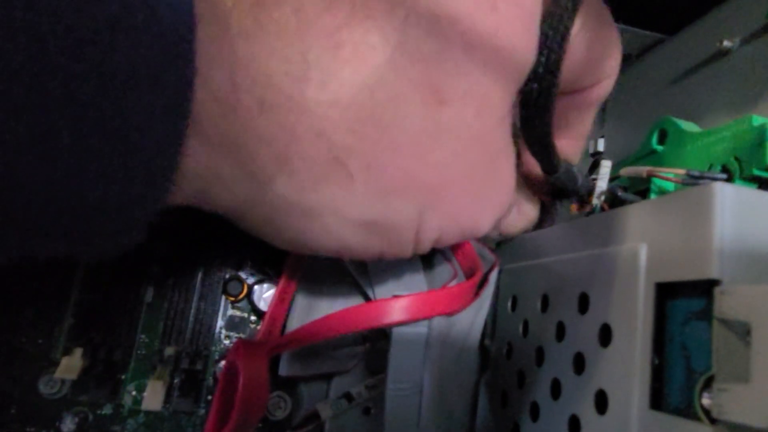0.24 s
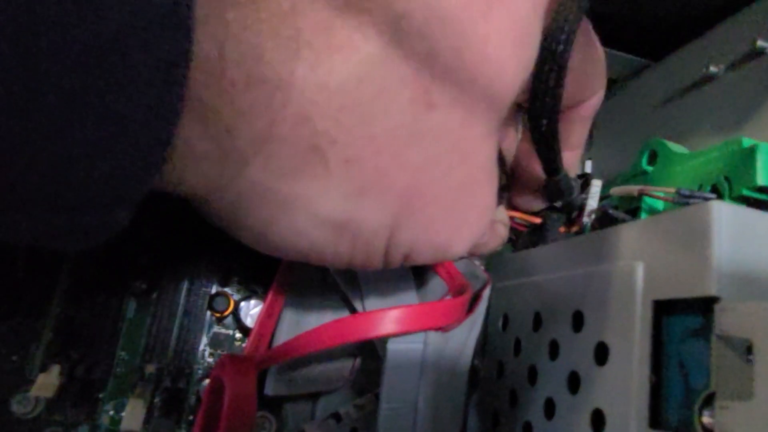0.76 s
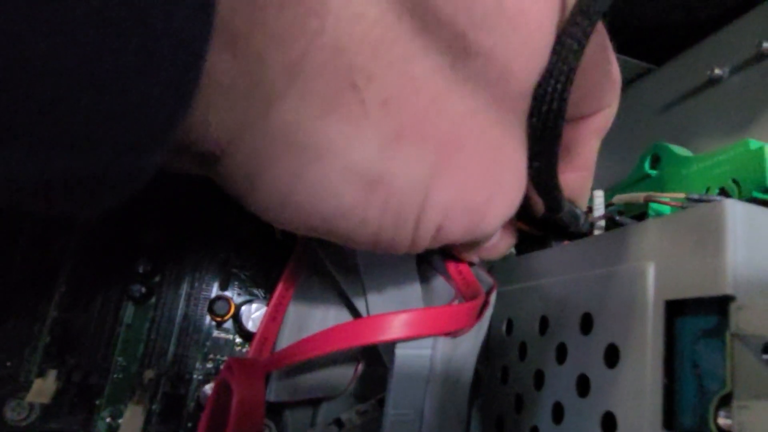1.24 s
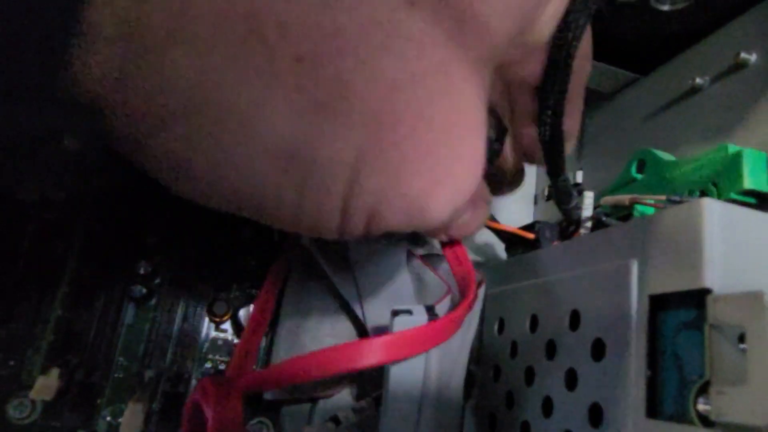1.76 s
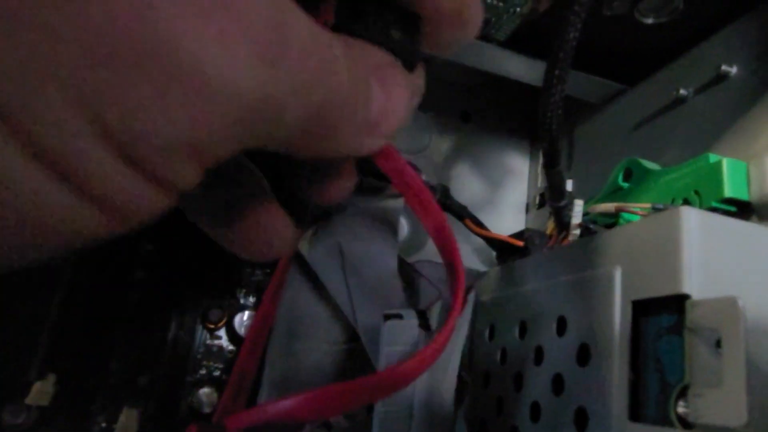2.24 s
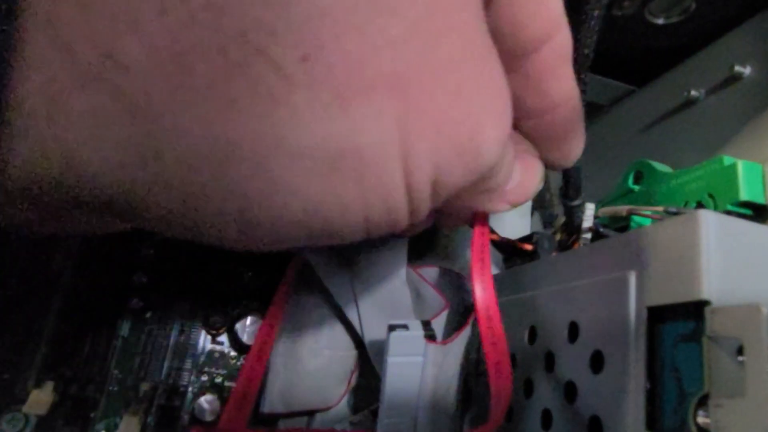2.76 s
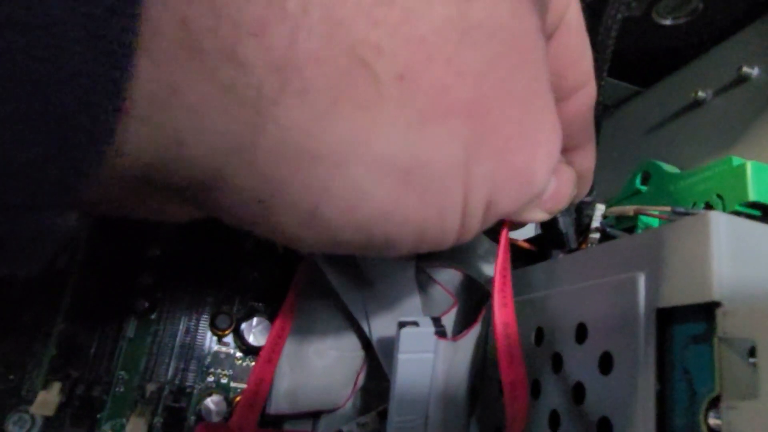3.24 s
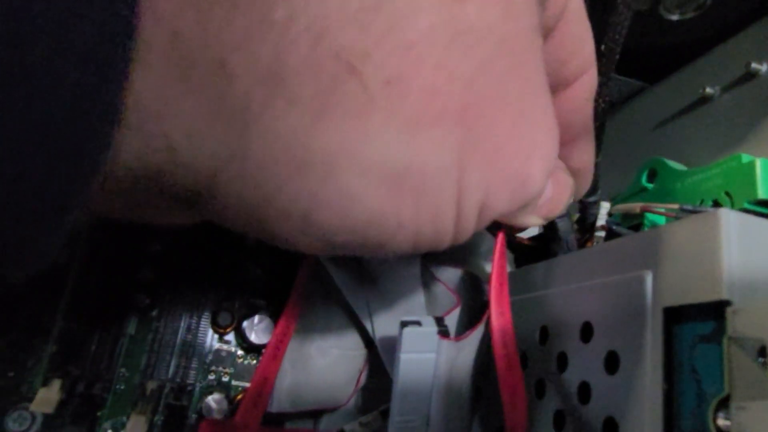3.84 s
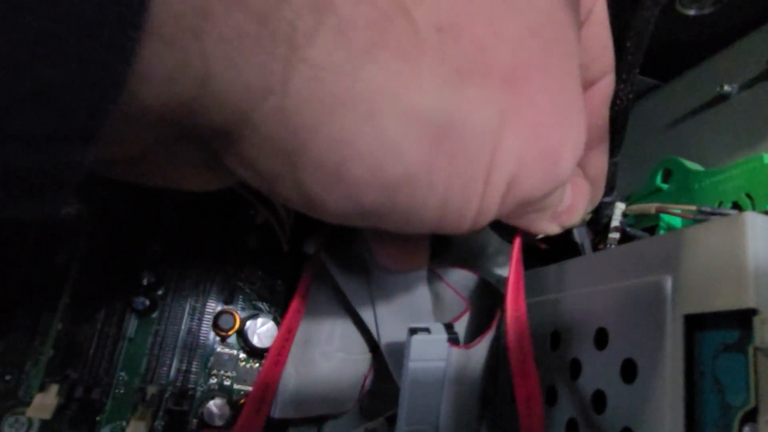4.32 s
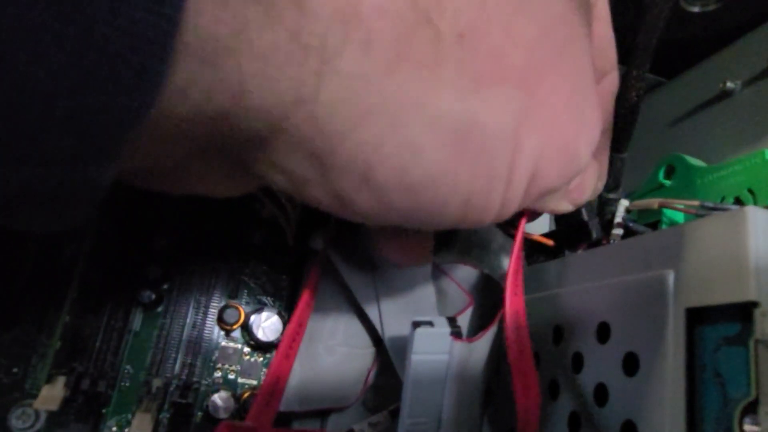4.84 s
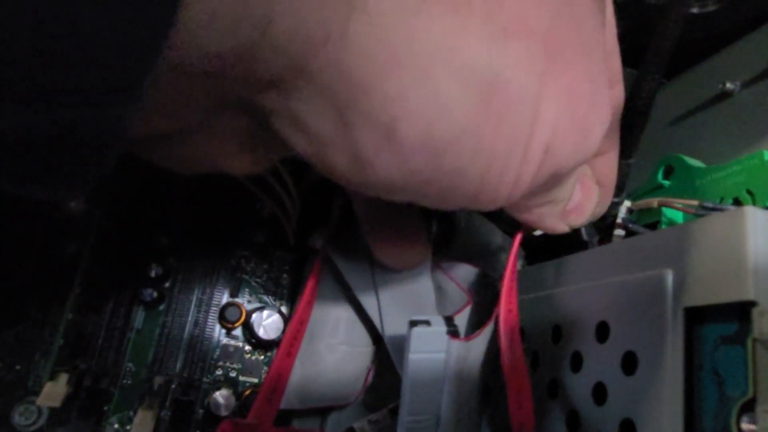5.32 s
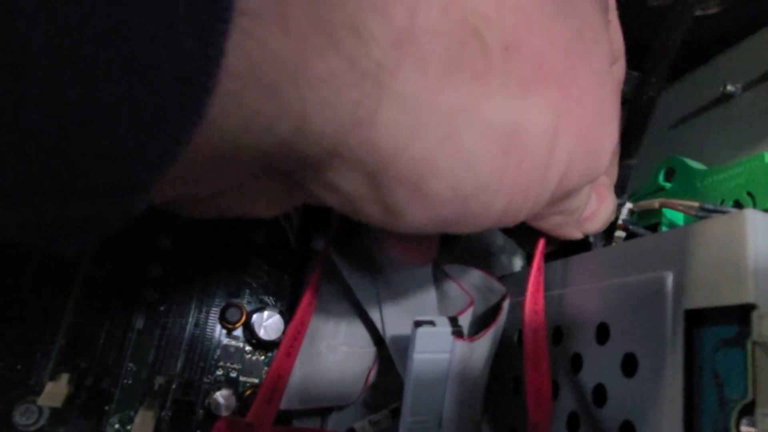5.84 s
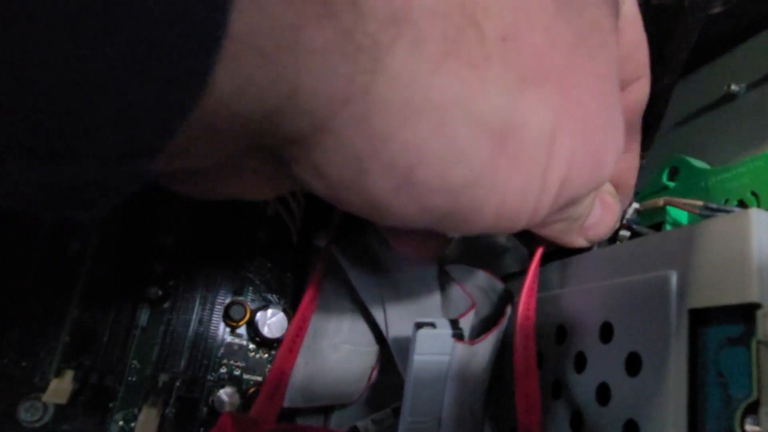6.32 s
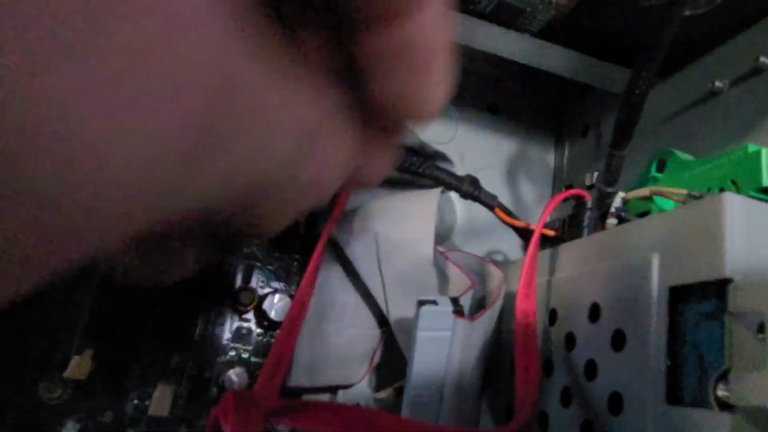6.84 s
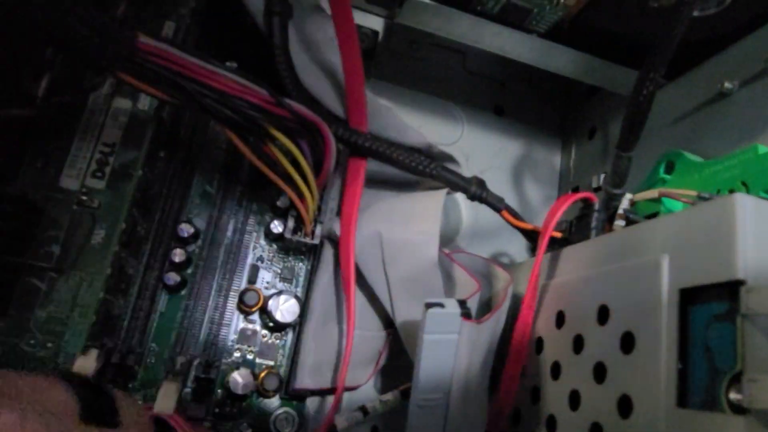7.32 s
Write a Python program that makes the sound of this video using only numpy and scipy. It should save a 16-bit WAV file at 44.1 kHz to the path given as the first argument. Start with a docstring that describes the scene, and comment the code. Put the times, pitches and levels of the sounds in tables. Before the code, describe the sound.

Very close, dry sound inside an open steel computer case in a quiet room, with faint steady hiss. Light rubbing starts, then a hard double clack with a short metallic ring and rattle at 0.3 s. After a quiet gap, another hollow knock with a dull thump lands at 1.1 s. From 1.5 to 2.25 s comes the busiest passage: dense plastic ticks, grainy cable scraping, connector knocks and a heavy low thump at about 2.0 s. It drops away to near silence. A modest knock sounds at 2.9 s, with small clicks around 3.0 to 3.3 s, the last one sharper. Almost nothing follows until 4.6 to 5.15 s, when soft clicks and rubbing return. Faint touches continue until a crisp, bright double knock at 6.25 s. A looser flurry of snaps, rustles and thumps runs from 6.7 to 7.1 s, then small taps near 7.2 s fade into hiss.

```python
"""Inside an open steel computer case, hands plug cables right next to a small camera.
Connectors knock: ringing case modes, a noise rattle and a crack. Cables tick: short damped sines.
Cables and skin drag: grainy noise that also excites the case modes. The case thumps: low damped sines.
The hollow case adds a short diffuse tail to ticks and knocks; faint shaped-noise hiss lies under it all."""
import sys
import numpy as np
from scipy import signal
from scipy.fft import rfft, irfft, next_fast_len
from scipy.io import wavfile
from scipy.ndimage import uniform_filter1d, map_coordinates

SR = 44100
rng = np.random.default_rng(int(sys.argv[2]) if len(sys.argv) > 2 else 0)


def store_pcm(level_fs):
    """Save levels as 16-bit WAV."""
    pcm = np.round(np.clip(level_fs, -1, 1) * 32767).astype(np.int16)
    wavfile.write(sys.argv[1], SR, np.atleast_2d(pcm).T)


N = 334278

# Connectors knocking the case, before tail and microphone: start_s, peak_db, dull_hz, sharp_hz,
# sharp_db, ring_length_factor, rattle_db (re ring)
KNOCK_EVENTS = [(0.303, -35.5, 1110, 1800, 10, 1.1, 5), (0.3296, -11.5, 690, 2510, -5, 1, -1),
                (.333, -17, 285, 3886, -11.5, 1.14, -7.5), (0.442, -31.5, 530, 1560, 2.5, 0.47, 11),
                (.819, -51.5, 659, 1600, -1.5, 3.8, 11.5), (1.122, -11.5, 550, 2600, -4.5, 1.38, -0.5),
                (1.9041, -15, 968, 1996, 5.5, 1.02, -4), (1.997, -20.5, 1080, 1980, -2, 0.36, -11),
                (2.075, -18.5, 1053, 1924, 3.5, 0.45, -4), (2.681, -50, 760, 1880, -30, 1.3, -10.5),
                (2.749, -48, 880, 1530, -32, 2.2, -5), (2.835, -54, 700, 1600, -18, 1.42, -8),
                (2.862, -25.5, 850, 4206, -9, 0.69, -3.5), (4.588, -50.5, 900, 2650, 11.5, 2.04, 9),
                (5.2986, -36.5, 774, 2190, 8.5, 0.97, -1), (6.2429, -19, 745, 3000, 15.5, 0.58, 0.5),
                (6.29, -29.5, 872, 2074, -4, 0.37, -5.5), (6.394, -54, 644, 1620, -11, 0.84, -14),
                (6.551, -66.5, 982, 2084, 6, 0.796, 8.5), (7.176, -47.5, 620, 2480, 15.5, 2.7, -3.5),
                (7.2071, -22.5, 820, 3020, 0.5, 0.46, -2.5), (7.2554, -33, 695, 1810, -8, 0.53, -12),
                (7.437, -54.5, 910, 2550, -1.5, 3.9, 8)]
# Clearest slips of cables, before tail and microphone: start_s, peak_db, pitch_hz, life_cycles, push_db
TICK_EVENTS = [(0.3895, -34.5, 2830, 0.3, -55.5), (1.477, -39, 2596, 5.8, -39),
               (1.5863, -22, 2870, 0.39, -35), (1.6012, -21, 1740, 0.5, -46), (1.611, -34, 4000, .5, -42.5),
               (1.6278, -22, 2200, .45, -41), (1.6317, -12.5, 1330, 0.83, -21),
               (1.6427, -18, 1260, 3.1, -7.5), (1.6497, -18.5, 3980, 0.31, -43),
               (1.6555, -20.5, 1940, .38, -33), (1.66, -19, 1880, 0.3, -20), (1.7, -30.5, 2840, .5, -42),
               (1.7118, -29, 2300, .6, -34.5), (1.7161, -13, 1880, .66, -12), (1.722, -27, 1605, 1.3, -42),
               (1.7552, -22, 1980, 2.9, -18), (1.7701, -26, 1880, 2.7, -39), (1.785, -33, 2080, 1.3, -15),
               (1.8026, -19, 1780, 0.65, -30), (1.8377, -20, 2020, .77, -44), (1.9208, -15, 1870, 1.2, -37),
               (1.939, -32, 4800, 1.2, -74), (1.968, -26, 3940, 0.5, -32), (1.984, -24, 1970, 1.3, -22.5),
               (2.0053, -19.5, 2750, .83, -42), (2.0127, -17, 1920, 2.8, -12),
               (2.0535, -17.5, 1920, 0.78, -24), (2.0839, -24.5, 1840, 2.5, -13),
               (2.1046, -28.5, 1880, 2.7, -25), (2.1171, -26.5, 2680, 0.44, -37),
               (2.1778, -25.5, 1690, .57, -22.5), (2.2227, -29, 1950, 1.7, -21.5),
               (2.262, -45.5, 2320, 1.1, -57), (2.303, -47.5, 2160, .79, -71.5),
               (2.4849, -51, 2044, 3, -58.5), (2.5303, -52.5, 2235, 2.8, -54),
               (2.775, -43, 1730, 0.37, -39), (3.0017, -38.5, 2490, 3.5, -65),
               (3.0153, -43, 5530, .84, -60), (3.0286, -31.5, 1360, 0.4, -30), (3.075, -49, 2590, 2.3, -41),
               (3.1198, -41, 2790, 2.7, -54), (3.1303, -38, 2650, 1.9, -37),
               (3.1415, -35.5, 2520, 1.1, -35), (3.195, -42.5, 2360, 2.3, -29.5),
               (3.2927, -19.5, 2110, 0.48, -10), (3.321, -32, 1570, 0.76, -47),
               (3.456, -54.5, 1500, 1.22, -42), (3.9267, -49.5, 1100, 0.53, -42),
               (4.5178, -51.5, 2673, 0.68, -46), (4.5919, -42, 2420, 0.83, -49),
               (4.656, -29.5, 2910, 1.6, -28), (4.6777, -28.5, 3600, 0.3, -18.5),
               (4.724, -39, 7000, 0.95, -60), (4.7964, -43, 2200, 1.4, -22), (4.845, -41, 2390, 1.4, -23),
               (4.8535, -42, 6500, .8, -55), (4.8668, -31.5, 1980, 0.88, -19),
               (4.9353, -23, 2750, 0.39, -21), (4.9451, -32, 2630, 1, -28), (4.9595, -25, 2500, .44, -25),
               (5.0176, -26, 2420, .72, -21.5), (5.0532, -36.5, 4830, 0.25, -20.5),
               (5.0889, -23.5, 2000, 0.43, -20), (5.111, -45, 6000, 0.72, -62),
               (5.131, -28.5, 2620, 0.27, -19), (5.5054, -52.5, 2237, 0.89, -45.5),
               (6.4373, -57, 3940, 1.23, -53), (6.7076, -34, 1930, 2.2, -22.5),
               (6.7778, -35, 2150, 1.2, -47), (6.7991, -22.5, 2500, 0.67, -16),
               (6.8212, -17.5, 1640, 0.62, -8.5), (6.8526, -33, 1600, 2.8, -23),
               (6.9, -19.5, 1800, 0.49, -14.5), (6.9605, -18.5, 2200, 0.47, -27),
               (6.9687, -32, 2650, 1.3, -41), (7.0334, -34.5, 1500, 0.6, -33),
               (7.0873, -28.5, 3080, 0.43, -37), (7.2605, -43, 5000, .6, -52), (7.277, -45, 2870, 1.2, -66),
               (7.3073, -41, 2280, 0.89, -62)]
# Soft thumps through the case: start_s, peak_db, pitch_hz
THUMP_EVENTS = [(0.153, -33.5, 110), (0.247, -41, 87), (0.328, -24, 82), (.661, -42, 120),
                (0.937, -46.5, 82), (1.123, -19.5, 140), (1.474, -29.5, 74), (1.562, -22.5, 77.4),
                (1.624, -17.5, 157), (1.757, -20.5, 133), (2.0173, -7, 74.3), (2.177, -23, 125),
                (2.22, -32.5, 99), (2.756, -42.5, 56.5), (3.022, -41, 68), (3.296, -26, 105),
                (3.783, -57.5, 63.2), (3.913, -60, 145), (4.066, -50, 59), (4.304, -53.5, 67),
                (4.589, -34.5, 61), (4.677, -28.5, 117), (4.779, -43, 75), (5.356, -38, 65.4),
                (5.496, -67, 109.6), (5.646, -45.5, 75.6), (5.884, -43.5, 62), (6.172, -39.5, 76),
                (6.415, -45, 58.5), (6.799, -26, 107), (6.82, -18.5, 101), (6.897, -23, 127),
                (6.937, -31, 133), (6.963, -23, 105), (7.058, -35, 170), (7.243, -48, 93.5)]
# Strokes of cables and skin: full_pressure_s, held_s, rustle_db, rumble_db, brightness_db
DRAG_STROKES = [(0.0, .11, -73, -55.5, 6.5), (.25, .05, -52, -35.5, -3), (.345, .01, -36.5, -31.5, -10.5),
                (.41, 0.07, -50, -39, -16), (0.659, 0.012, -62.5, -45, -24.5),
                (.83, 0.027, -60.5, -61.5, -12), (.96, .03, -66, -52, -8.5), (1.16, 0.0266, -47, -40.5, -9),
                (1.271, 0.11, -65.5, -60.5, -11), (1.512, 0.18, -47.5, -37.5, 0.5),
                (1.62, 0.16, -33.5, -31, -1), (1.92, 0.029, -42.5, -40, 4.5), (2.03, 0.05, -39, -33, 0.5),
                (2.21, 0.013, -48.5, -49, 2), (2.4, 0.16, -76.5, -68.5, 4), (2.7, 0.085, -66, -61, -3),
                (2.885, 0.0092, -58, -51, 3), (3.035, 0.028, -49, -47, -6),
                (3.146, 0.022, -51, -43.5, -3.5), (3.28, 0.034, -51, -47.5, -4.5),
                (3.4, 0.1, -68, -68.5, -15), (3.55, .03, -72.5, -60, -1), (3.68, .1, -79, -74.5, -6),
                (4.08, 0.016, -76, -67.5, -0.5), (4.32, .02, -82.5, -70.5, -2),
                (4.52, 0.057, -75.5, -64, 6), (4.672, 0.029, -50.5, -38.5, 3),
                (4.773, 0.076, -47.5, -35.5, 1.5), (4.88, 0.056, -43, -33.5, -0.5),
                (4.99, .13, -54.5, -42, 1), (5.32, 0.045, -68, -58.5, 1), (5.641, 0.048, -70, -58, -5),
                (5.741, .05, -70, -67, -7), (5.9, 0.015, -74.5, -59.5, -1), (6.2, 0.027, -71, -56.5, -3),
                (6.25, 0.042, -67.5, -50, 9.5), (6.43, 0.0056, -65.5, -67.5, -18.5),
                (6.702, 0.022, -46, -42, -6.5), (6.818, 0.054, -39, -38.5, -2.5),
                (6.928, 0.04, -47, -36, 4), (7.06, 0.026, -61.5, -58, 3), (7.201, 0.099, -57, -54, 2.5),
                (7.453, 0.013, -61.5, -53.5, 0.5)]
# Modes of the steel case: mode_hz, level_db, t60_s
CASE_MODES = [(278.6, -4, 0.13), (390, -7, 0.088), (461.6, -7.5, 0.073), (561, 0, 0.13), (648.2, -3, 0.13),
              (715, -4.5, 0.097), (850, -4.5, 0.069), (916.6, -2.5, 0.09), (992.6, -2.5, 0.087),
              (1116, -4.5, 0.057), (1325, -3.5, 0.06), (1476, -11.5, 0.048), (1886, -6, 0.039),
              (2027, -8, 0.078), (2295, -4.5, 0.032), (2834, -10.5, 0.035), (2970, -2.5, 0.028),
              (3325, -5.5, 0.035), (3610, -8.5, 0.044), (3940, -2.5, 0.039), (4270, -6, 0.036),
              (4830, -8.5, 0.03), (5100, -5.5, .025), (5800, -12.5, 0.034)]
# Rattle decay, before the ring length factor: freq_hz, t60_s
RATTLE_DECAY = [(150, 0.32), (700, 0.13), (1800, 0.096), (5000, 0.051), (12000, .06)]
# Relative spectrum of the rumble through the case: freq_hz, level_db_per_hz
RUMBLE_SPECTRUM = [(15, -52), (25, -10.5), (70, 7), (97, -2), (167, -3), (344, -13), (401, -16),
                   (700, -21.5), (910, -49), (1540, -120)]
# Relative spectrum of the rustle: freq_hz, level_db_per_hz
RUSTLE_SPECTRUM = [(180, -32), (300, -3.5), (404, -10), (476, -7.5), (517, -6.5), (985, -10), (2520, -14.5),
                   (6460, -26.5), (7250, -37), (15500, -61.5)]
# Relative spectrum of the rattle, before the knock's colour: freq_hz, level_db_per_hz
RATTLE_SPECTRUM = [(59, -36), (100, -8), (238, -21), (564, -10), (861, -20), (1430, -7), (1880, -15.5),
                   (2420, -15), (2630, -14), (6000, -32), (15500, -74.5)]
# Relative spectrum of the hiss: freq_hz, level_db_per_hz
HISS_SPECTRUM = [(15, -36), (25, -2.5), (107, -0.5), (729, -7.5), (1550, -15.5), (2520, -15.5),
                 (3990, -12.5), (5520, -13.5), (14600, -13.5), (15800, -20)]
# Microphone response, treble loss: freq_hz, gain_db
MIC_RESPONSE = [(4000, 3), (7000, 3), (8000, -11), (16000, -20.5)]

HISS_DB, TOP_HZ = -78, 15800
RISE_DB_PER_S, FALL_DB_PER_S = 301, 201  # a stroke builds faster than it lets go
REST_RUSTLE_DB, REST_RUMBLE_DB, REST_BRIGHT_DB = -83, -77, 0  # hands lying still
SMALL_PER_S, SMALL_RE_RUSTLE_DB, SMALL_SPREAD_DB = 25, -1.5, 6
SMALL_MEDIAN_HZ, SMALL_MEDIAN_CYCLES, SMALL_PUSH_RE_TICK_DB = 4030, 0.66, -12
THUMP_T60_CYCLES = 3.9


def amp(db):
    """dB to gain."""
    return 10 ** (np.asarray(db) / 20)


def unit(x):
    """Scaled to rms 1."""
    return x / np.sqrt(np.mean(x ** 2) + 1e-20)


def along(points, hz):
    """Interpolates (Hz, value) points on a log frequency axis."""
    f, v = np.transpose(points)
    return np.interp(np.log(hz + 1), np.log(f + 1), v)


def filtered(x, response):
    """x times a response of frequency."""
    m = next_fast_len(len(x) + 8192)
    return irfft(rfft(x, m) * response(np.fft.rfftfreq(m, 1 / SR)), m)[:len(x)]


def shaped(x, spectrum):
    """x coloured by a dB table."""
    return filtered(x, lambda hz: amp(along(spectrum, hz)))


def wobble(knots_per_s):
    """A smooth random curve through normal knots."""
    knots = rng.standard_normal(int(N * knots_per_s / SR) + 4)
    return map_coordinates(knots, [np.arange(N) * knots_per_s / SR])


def add(track, start_s, sound):
    """Mixes a sound into the track."""
    part = track[round(start_s * SR):][:len(sound)]
    part += sound[:len(part)]


def hiss():
    """Steady noise with the camera's hiss spectrum."""
    return amp(HISS_DB) * unit(shaped(rng.standard_normal(N), HISS_SPECTRUM))


def thumps():
    """The case rocks for a cycle or two at a low pitch."""
    out, t = np.zeros(N), np.arange(SR // 3) / SR
    for start_s, peak_db, pitch_hz in THUMP_EVENTS:
        fall = amp(-60 * t * pitch_hz / THUMP_T60_CYCLES)
        swing = fall * (1 - np.exp(-t / 0.0042)) * np.sin(2 * np.pi * pitch_hz * t)
        add(out, start_s, amp(peak_db) * swing / np.abs(swing).max())
    return out


def pressure():
    """Rustle dB, rumble dB and brightness dB per sample; each stroke rises, holds and lets go."""
    t = np.arange(0, N / SR + .01, 1 / 500)
    full_s, held_s, rustle_db, rumble_db, bright_db = np.transpose(DRAG_STROKES)[:, :, None]
    rise_db = -RISE_DB_PER_S * np.maximum(full_s - t, 0)
    fall_db = -FALL_DB_PER_S * np.maximum(t - full_s - held_s, 0)
    shape_db = rise_db + fall_db
    # strokes add as powers; brightness is their power-weighted mean
    share, rest = amp(2 * (rustle_db + shape_db)), amp(2 * REST_RUSTLE_DB)
    rustle = share.sum(axis=0) + rest
    rumble = amp(2 * (rumble_db + shape_db)).sum(axis=0) + amp(2 * REST_RUMBLE_DB)
    bright = ((share * bright_db).sum(axis=0) + rest * REST_BRIGHT_DB) / rustle
    curves = (10 * np.log10(rustle), 10 * np.log10(rumble), bright)
    return [np.interp(np.arange(N) / SR, t, curve) for curve in curves]


def scratch_grain(lumps_db):
    """Stick-slip impulses on noise, in uneven level and patchy colour."""
    hits = rng.random(N) < 300 / SR
    slips = hits * amp(3.6 * rng.standard_normal(N)) * np.sign(rng.standard_normal(N))
    grain = unit(rng.standard_normal(N) + 0.72 * unit(slips))
    grain = grain * amp(lumps_db + 3.1 * wobble(260))
    z = signal.stft(grain, nperseg=256)[2]
    patches = uniform_filter1d(rng.standard_normal(z.shape), size=5, axis=0)
    patches = uniform_filter1d(patches, size=7, axis=1)
    return signal.istft(z * amp(1.3 * unit(patches)), nperseg=256)[1][:N]


def case_response(f):
    """Sum of resonances; a lightly touched panel rings longer than a pressed one."""
    total = 0
    for mode_hz, level_db, t60_s in CASE_MODES:
        width_hz = np.log(1000) / (np.pi * 1.6 * t60_s)
        damping = 1j * f * width_hz
        total = total + amp(level_db) * damping / (mode_hz ** 2 - f * f + damping)
    return total


def drag():
    """Stick-slip grains on noise: a dull rumble through the case and a rustle that wakes the case modes."""
    rustle_db, rumble_db, bright_db = pressure()
    lumps_db = 0.76 * wobble(30)  # uneven grip shakes both layers
    rustle = unit(shaped(scratch_grain(lumps_db), RUSTLE_SPECTRUM))
    treble = filtered(rustle, lambda hz: 1 / (1 + (2800 / (hz + 1)) ** 4))
    rustle = amp(rustle_db) * (rustle + (amp(bright_db) - 1) * treble)
    rumble = unit(shaped(rng.standard_normal(N) * amp(lumps_db), RUMBLE_SPECTRUM))
    return amp(rumble_db) * rumble + rustle + amp(-1.5) * filtered(rustle, case_response)


def small_ticks():
    """Tick rows at random moments; their level follows the rustle."""
    chance = rng.standard_normal((200, 5))
    gap_s = (chance[:, 0] ** 2 + chance[:, 1] ** 2) / 2 / SMALL_PER_S  # exponential gaps
    start_s = np.cumsum(gap_s)
    rustle_db = np.interp(start_s * SR, np.arange(N), pressure()[0])
    peak_db = rustle_db + SMALL_RE_RUSTLE_DB + SMALL_SPREAD_DB * chance[:, 2]
    pitch_hz = SMALL_MEDIAN_HZ * np.exp(.3 * chance[:, 3])
    cycles = SMALL_MEDIAN_CYCLES * np.exp(.4 * chance[:, 4])
    return list(np.transpose([start_s, peak_db, pitch_hz, cycles, peak_db + SMALL_PUSH_RE_TICK_DB]))


def ticks():
    """A slip is a dry snap of a cycle or a few, and a short push that rocks the camera body back."""
    out, t = np.zeros(N), np.arange(SR // 30) / SR
    push = amp(-60 * t / 0.0088) * np.sin(2 * np.pi * 300 * (t - .00055)) * (1 - np.exp(-t / 0.0006))
    edge = 0.18 * np.exp(-(t / .00004) ** 2)  # hard onset, strongest in the driest snaps
    for start_s, peak_db, pitch_hz, cycles, push_db in list(TICK_EVENTS) + small_ticks():
        life = t * pitch_hz / cycles
        snap = -np.exp(-1.5 * life) * (1 - np.exp(-4 * life)) * np.sin(2 * np.pi * pitch_hz * t)
        snap = snap / np.abs(snap).max() - edge / cycles ** 2
        add(out, start_s, amp(peak_db) * snap + amp(push_db) * push)
    return out


def band(f, centre_hz):
    """A bell on the log frequency axis, 14 dB down an octave away."""
    return amp(-14 * np.log2((f + 1) / centre_hz) ** 2)


def case_ring(t, near, length):
    """Case modes as decaying sines; hand pressure detunes the panels a little."""
    hz, level_db, t60_s = np.transpose(CASE_MODES)[:, :, None]
    chance = rng.standard_normal((3, len(CASE_MODES), 1))
    fall = np.exp(-np.log(1000) * t / (t60_s * length))
    phase = 2 * np.pi * hz * (1 + 0.0088 * chance[1]) * t + 2 * chance[2]
    return np.sum(amp(level_db + 0.88 * chance[0]) * near(hz) * fall * np.sin(phase), axis=0)


def case_rattle(t, near, length):
    """Coloured noise whose decay time depends on frequency."""
    f, frame_s, z = signal.stft(rng.standard_normal(len(t)), SR, nperseg=128)
    colour = amp(along(RATTLE_SPECTRUM, f)) * near(f) ** 1.2
    fade = amp(-60 * frame_s / (length * along(RATTLE_DECAY, f)[:, None]))
    return signal.istft(z * colour[:, None] * fade, SR, nperseg=128)[1][:len(t)]


def knocks():
    """Each blow cracks, rings the case modes near its two colours and leaves a decaying rattle."""
    out, t = np.zeros(N), np.arange(SR // 4) / SR
    for start_s, peak_db, dull_hz, sharp_hz, sharp_db, length, rattle_db in KNOCK_EVENTS:
        def near(f):
            """Dull and sharp colour of the blow."""
            return band(f, dull_hz) + amp(sharp_db) * (band(f, sharp_hz) ** 1.8 + 0.24)

        ring = case_ring(t, near, length)
        rattle = case_rattle(t, near, length)
        crack = amp(np.minimum(sharp_db, 0) - 16 - 60 * t / 0.011) * rng.standard_normal(len(t))
        sound = ring / np.abs(ring).max() + amp(rattle_db) * rattle / np.abs(rattle).max() + crack
        sound = sound * (1 - np.exp(-(t / 0.0013) ** 2))  # soft onset
        add(out, start_s, amp(peak_db) * sound / np.abs(sound).max())
    return out


def inside(x):
    """The hollow case and the desk around it answer with a short, dull, diffuse tail."""
    t = np.arange(SR // 3) / SR
    dull_noise = filtered(rng.standard_normal(len(t)), lambda hz: 1 / (1 + (hz / 2200) ** 2))
    tail = dull_noise * amp(-60 * t / 0.19)
    return x + amp(-18.5) * signal.fftconvolve(x, tail / np.linalg.norm(tail))[:N]


def scene():
    """All contacts and drags; only ticks and knocks take the tail and the microphone response."""
    contacts = inside(ticks() + knocks())
    return (thumps() + drag() + shaped(contacts, MIC_RESPONSE))[None]


def record(dry):
    """The camera adds its hiss, cuts the deepest bass and keeps nothing above its band limit."""
    bass_cut = lambda hz: (1j * hz / (24 + 1j * hz)) ** 4
    return filtered(dry[0] + hiss(), lambda hz: bass_cut(hz) * (hz < TOP_HZ))[None]


dry = scene()
out = record(dry)
store_pcm(out)
```